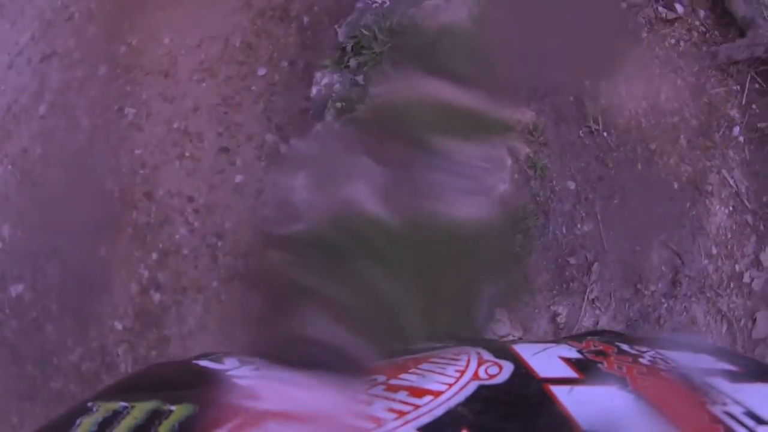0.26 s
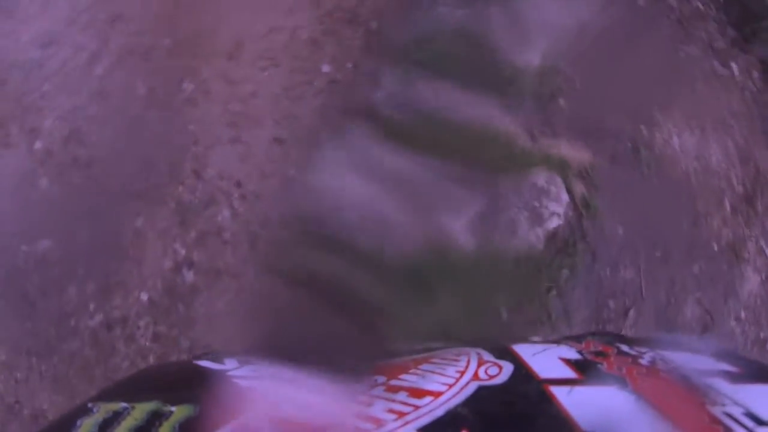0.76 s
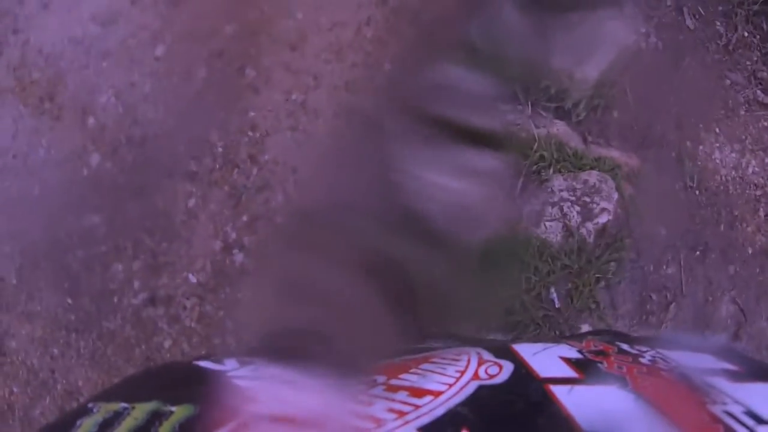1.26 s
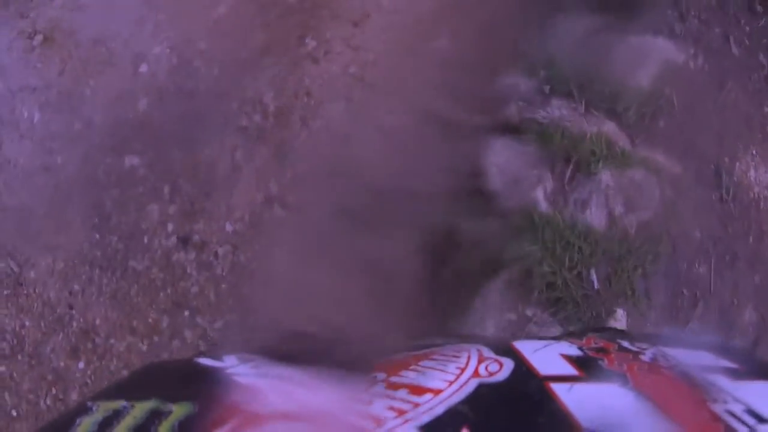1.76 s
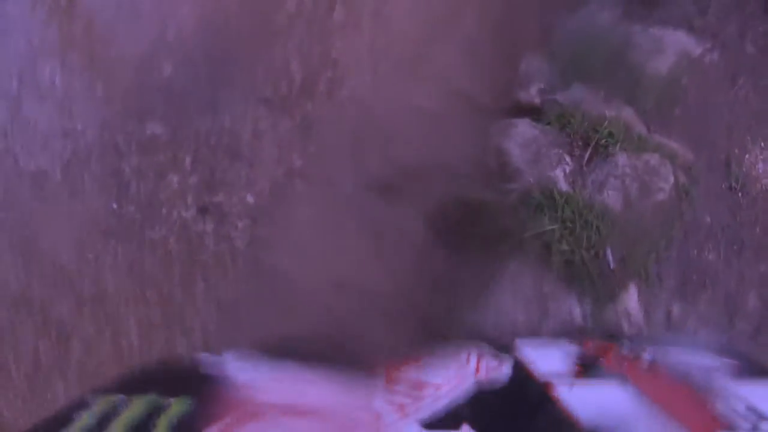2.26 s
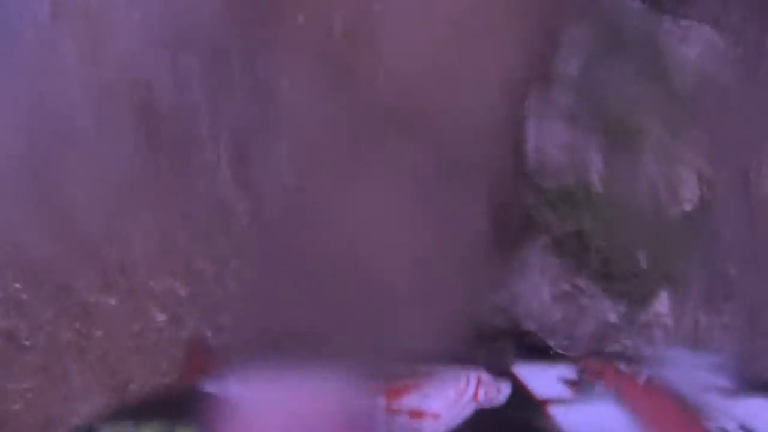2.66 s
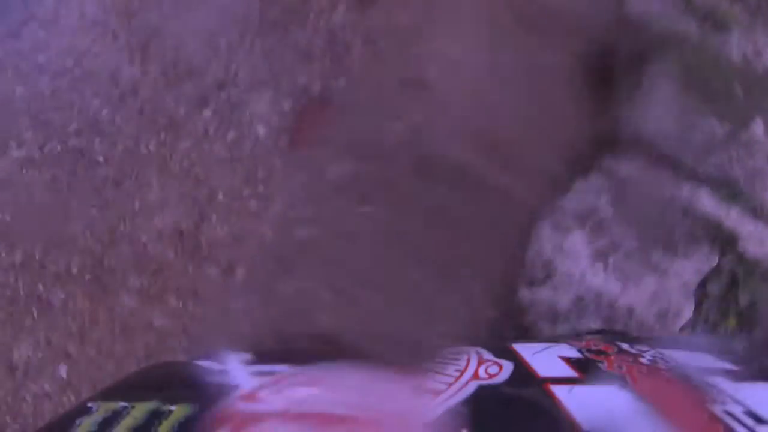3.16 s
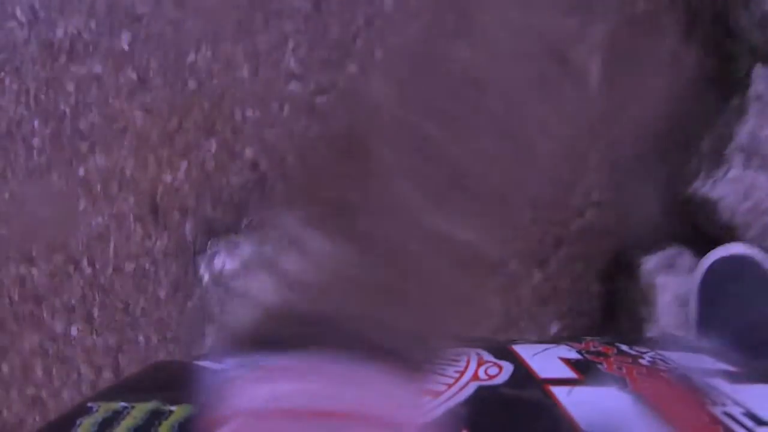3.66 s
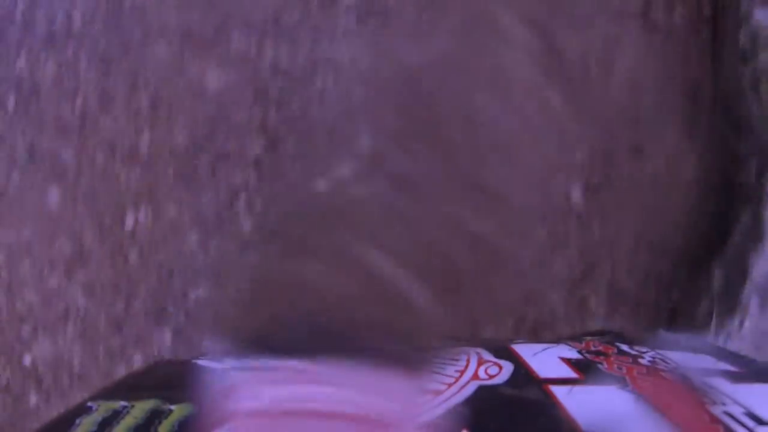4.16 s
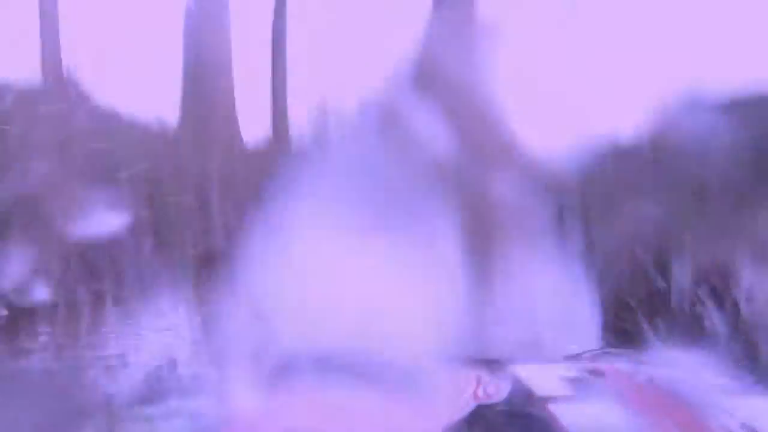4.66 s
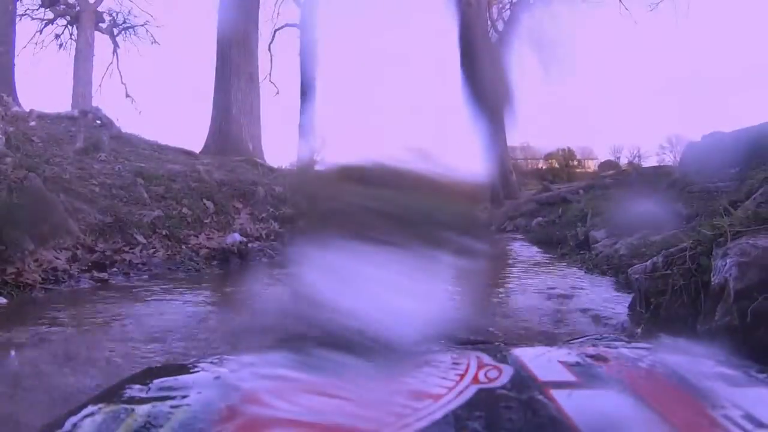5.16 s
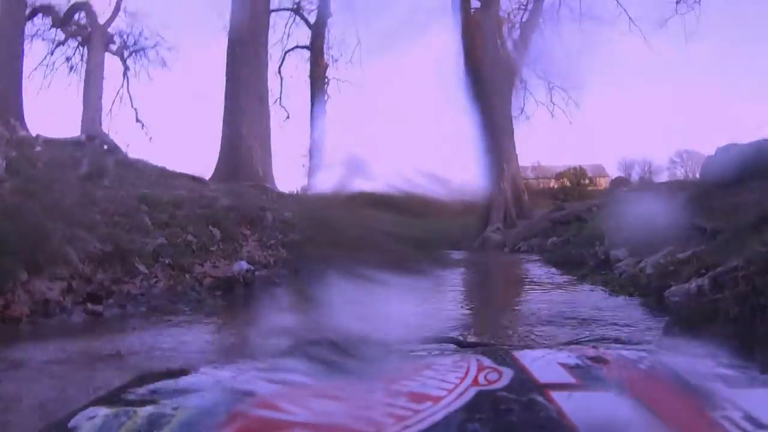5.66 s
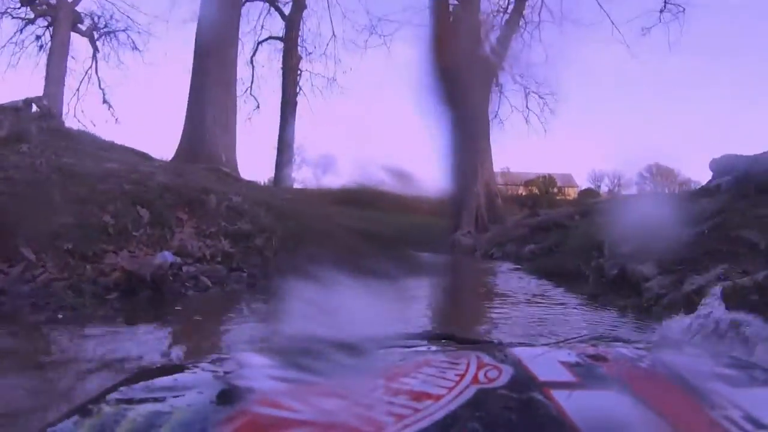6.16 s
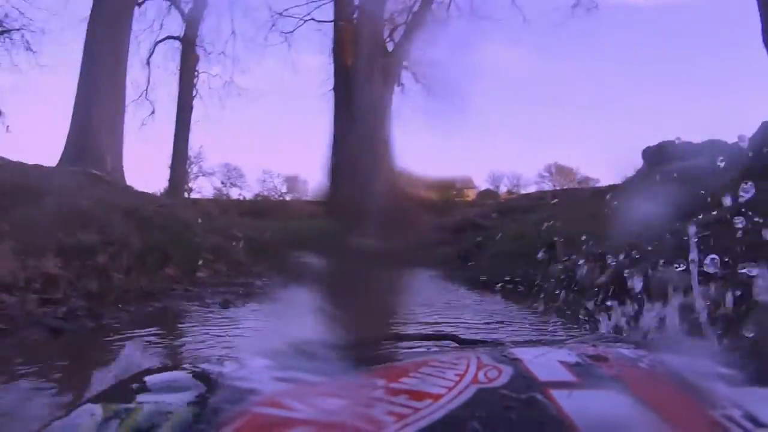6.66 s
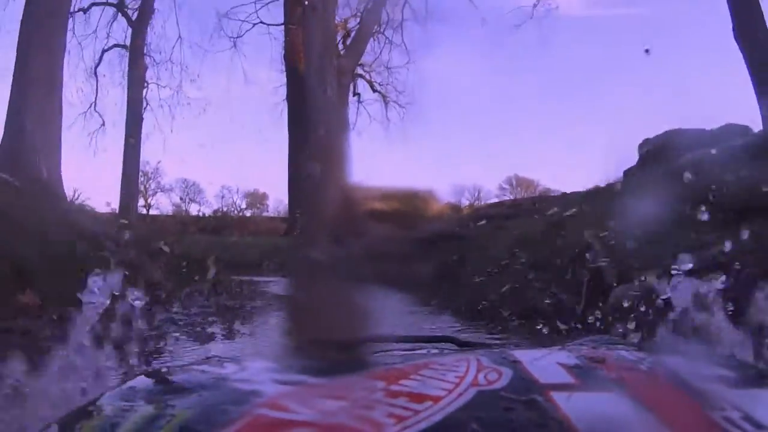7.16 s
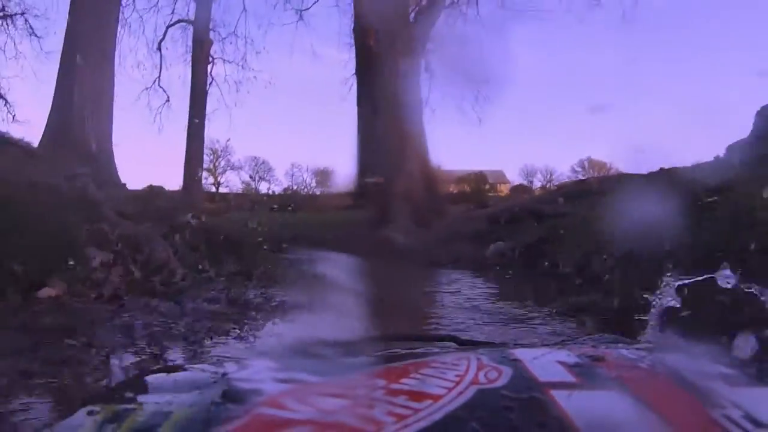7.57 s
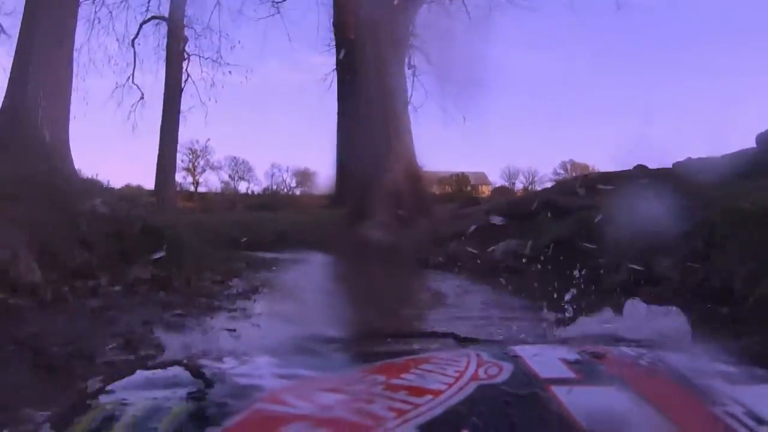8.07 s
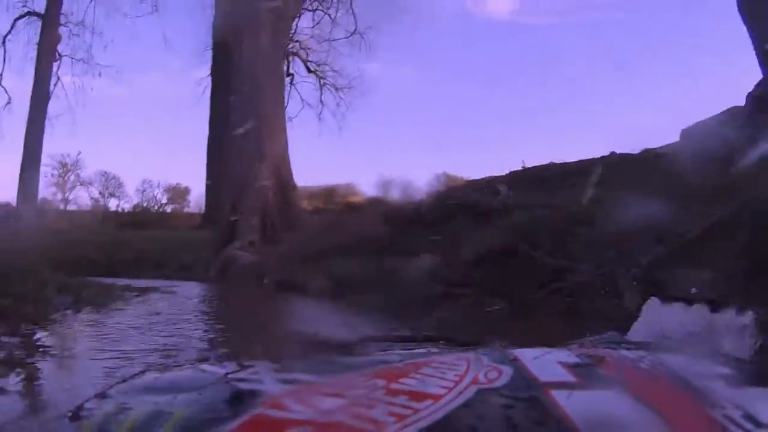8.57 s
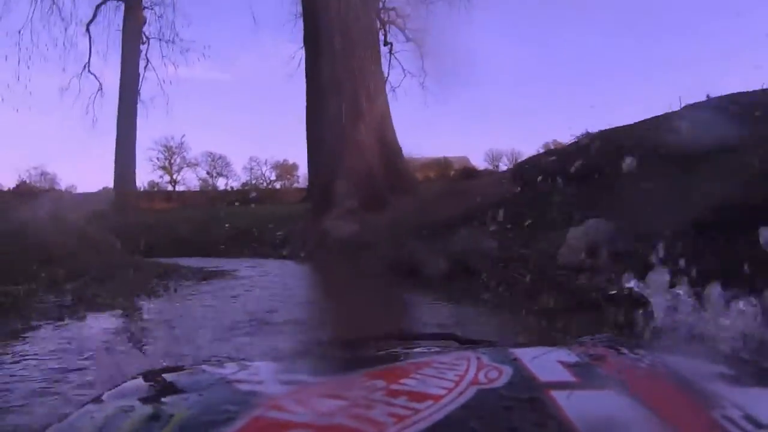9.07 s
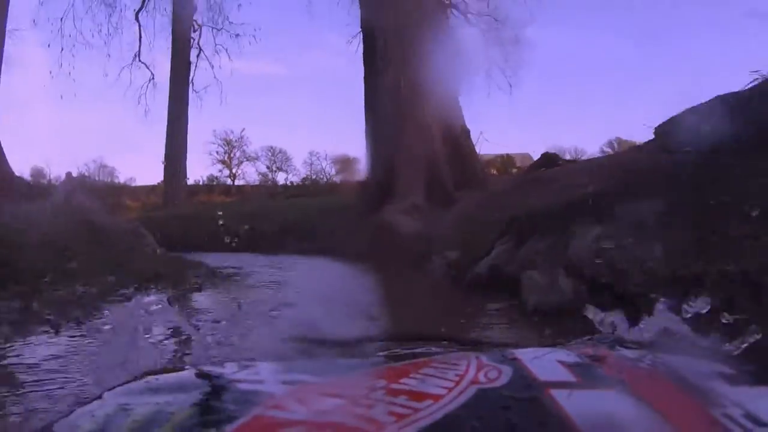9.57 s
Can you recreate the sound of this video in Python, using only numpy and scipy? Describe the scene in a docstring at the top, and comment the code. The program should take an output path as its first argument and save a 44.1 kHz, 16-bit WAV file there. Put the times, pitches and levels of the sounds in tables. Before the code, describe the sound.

Heard from inside a closed case, a toy vehicle grinds and clatters over stones, bumps hard, pauses, then drives on with gear whine and sloshing.

```python
"""A rattling, whining crawl, a lurch and a pause, then a steady hum with gear whine and sloshing, heard from inside a case.
A small electric model truck crawls, stops, then drives on through shallow creek water, carrying a closed camera case.
Shaped noise makes gear grind, bumps, sloshing and spray; sines at moving rates make wheels, motor, shaft and gears.
Decaying modes and noise make the knocks of a loose part; short noise decays make drops and grit ticking on the shell."""
import sys
import numpy as np
from scipy import signal
from scipy.fft import rfft, irfft, next_fast_len
from scipy.io import wavfile
from scipy.ndimage import map_coordinates

SR = 44100
rng = np.random.default_rng(int(sys.argv[2]) if len(sys.argv) > 2 else 0)


def gain_from_db(level_db):
    """Turn a decibel level (scalar or array-like) into a linear amplitude factor."""
    decades = np.asarray(level_db, float) / 20
    return 10 ** decades


def to_wav(sig):
    """Store sig (one row per channel, or 1-D mono) as 16-bit WAV at the path in sys.argv[1].

    Samples outside -1..1 are clipped; the rate is SR.
    """
    pcm = np.clip(np.atleast_2d(sig), -1, 1) * 32767
    pcm = np.round(pcm).astype(np.int16)
    wavfile.write(sys.argv[1], SR, pcm.T)  # frames by channels


N = 432621
TIME = np.arange(N) / SR
THROTTLE_OFF_S = 2.09

# wheels while crawling: time_s, rate_turns_per_s, shake_db (before the level of each multiple)
WHEEL_MOTION = [(0.0, 8.1, -33), (0.55, 11, -26), (0.86, 12.9, -25), (1.52, 18.3, -19.5), (1.66, 20, -12.5),
                (1.9, 21.6, -13), (2.08, 21, -12.5), (2.51, 18, -10.5), (2.74, 17, -19),
                (3.62, 11.9, -30.5), (4.31, 11.2, -25), (4.62, 10.7, -24)]
# motor while crawling: time_s, rate_turns_per_s, load_db, pinion_whine_db (levels before fixed trims)
MOTOR_MOTION = [(0, 84, -50, -31), (.12, 106, -52, -36), (.3, 93, -51, -31), (.38, 120, -54, -30),
                (.55, 135, -54, -36), (.8, 142, -49, -40), (1.25, 194, -35.5, -54), (1.4, 211, -27, -41),
                (1.57, 232, -21.5, -40), (1.75, 260, -20, -47), (1.92, 276, -18.5, -49),
                (2.07, 278, -17.5, -50), (2.16, 245, -53, -80), (3.4, 166, -66, -78), (4.45, 140, -60, -80)]
# shaking of the case: time_s, gear_grind_db, mount_db, bumps_db (levels before fixed trims)
CASE_SHAKING = [(0.0, -34.5, -26, -26), (0.41, -30, -31, -22), (0.68, -26.5, -23, -11),
                (0.82, -35, -27, -21), (1.31, -28.5, -25.5, -24), (1.42, -32.5, -30, -45),
                (1.8, -27.5, -35.5, -26), (2.12, -30.5, -28.5, -26), (2.4, -34, -24.5, -20.5),
                (2.81, -29, -22, -19), (3.41, -43, -31, -28), (3.79, -38, -37, -38), (4.4, -30, -24, -30.5),
                (4.72, -29, -18, -14.5), (4.78, -44.5, -33.5, -30), (5.16, -58.5, -52.5, -53),
                (5.41, -59, -44, -49), (5.46, -25.5, -22.5, -13.5), (5.6, -23.5, -16.5, -24),
                (9.7, -24.5, -15.5, -24), (9.81, -30, -23, -27)]
# loose part against the chassis: time_s, peak_db (before fixed trims), brightness_db
LOOSE_KNOCKS = [(0.367, -22, 3), (0.5292, -18, 0), (0.579, -13, 2), (0.6686, -15, 1), (0.709, -7.5, 4),
                (0.751, -11, -10), (0.7726, -6.5, -3), (0.796, -7.5, -1), (1.103, -16, -4),
                (1.174, -7, -12), (1.2033, -10.5, -7), (1.2435, -6.5, -10), (1.2686, -12.5, -10),
                (1.3106, -4.5, -17.5), (1.4849, -15, -2), (2.123, -4.5, -12.5), (2.2414, -4, -12.5),
                (2.2973, -3.5, -1), (2.353, -4.5, 1), (2.413, -4.5, 4.5), (2.4711, -4, -0.5),
                (2.5265, -8, -1.5), (2.588, -3.5, 0), (2.623, -16.5, 6), (2.649, -7.5, 3), (2.682, -8, 5.5),
                (2.711, -8, 6), (2.7468, -4.5, 5.5), (2.7724, -8, 1.5), (2.8086, -7.5, 6.5),
                (2.872, -10.5, 6.5), (2.9397, -14, 11), (3.0134, -11, 9.5), (3.0769, -6, 0.5),
                (3.0987, -8.5, -0.5), (3.1556, -14.5, 8.5), (3.2268, -10, -8), (3.2528, -1.5, -2),
                (3.3261, -11.5, -0.5), (4.6313, -7.5, 3), (4.6809, 0, 0), (4.7125, -9, 10.5),
                (5.335, -35, 1), (5.4297, -14, -10), (5.4483, -17, -14), (5.4861, -6, -11.5),
                (5.544, -12.5, -3), (5.5686, -13.5, -1.5), (5.6049, -16, 2)]


def unit(x):
    """Normalisation: scales a signal to an rms of 1."""
    return x / np.sqrt(np.mean(x ** 2) + 1e-20)


def along(points, hz):
    """Spectral envelope: joins (Hz, dB) points by straight lines on a log frequency axis."""
    point_hz, level_db = np.transpose(points)
    return np.interp(np.log(hz + 1), np.log(point_hz + 1), level_db)


def curves(rows):
    """Linear interpolation: one value per sample for each column after the time."""
    time_s, *columns = np.transpose(rows)
    return [np.interp(TIME, time_s, column) for column in columns]


def running(rows, fade_s):
    """Gating: 1 between the first and last row, fading linearly to 0 outside."""
    inside_s = np.minimum(TIME - rows[0][0], rows[-1][0] - TIME)
    return np.clip(inside_s / fade_s + 1, 0, 1)


def wobble(rate):
    """Slow random modulation: a smooth curve through normal random knots, rate knots a second."""
    knots = rng.standard_normal(int(N * rate / SR) + 4)
    return map_coordinates(knots, [TIME * rate])


def turns(hz):
    """Phase in radians as the running integral of a moving rate."""
    return 2 * np.pi * np.cumsum(hz) / SR


def coloured(x, db_at):
    """Minimum-phase filtering: folding the cepstrum makes the gain db_at(Hz), in dB, causal."""
    size = next_fast_len(N + SR // 4)
    gain = gain_from_db(db_at(np.fft.rfftfreq(size, 1 / SR)))
    cepstrum = irfft(np.log(gain + 1e-7), size)
    cepstrum[1:size // 2] *= 2
    cepstrum[size // 2 + 1:] = 0
    response = np.exp(rfft(cepstrum))
    return irfft(rfft(x, size) * response, size)[:N]


def case_ringing(hz):
    """Resonance: the closed case boosts bands round a few pitches, in dB."""
    # resonances of the case: centre_hz, width_hz (to 1/e of the boost), boost_db
    resonances = [(786, 33, 7), (1167, 210, 10.5), (1442, 38, 6), (1957, 520, 6), (3900, 350, 2.5),
                  (4915, 340, 7), (7110, 450, 7.5), (11050, 700, 6)]
    return sum(db * np.exp(-((hz - centre) / width) ** 2) for centre, width, db in resonances)


def case(hz):
    """Transmission: the closed case dulls the treble and rings at its resonances."""
    # sound through the case, before its resonances: frequency_hz, gain_db
    transmission = [(200, -16), (350, -10), (620, -16.5), (1000, -11), (1600, -10), (2600, -19),
                    (4000, -29.5), (5800, -47), (8200, -53), (15000, -78.5)]
    return along(transmission, hz) + case_ringing(hz)


def shell(hz):
    """Impact response: a drop on the shell sounds bright, with half the dB boost of the case resonances."""
    # a drop on the shell, before the resonances: frequency_hz, gain_db
    response = [(1500, -34), (3500, 3.5), (5000, 1), (7000, -10.5), (10000, -21), (13000, -25.5),
                (16000, -51)]
    return along(response, hz) + .5 * case_ringing(hz)


def shaking():
    """Forced vibration: rough gear contact through the case, the ringing mount and the bumps of the ground."""
    # modes of the camera mount: centre_hz, half_power_width_hz, level_db
    mount_modes = [(167, 55, -6.5), (192.3, 22, 3), (209.7, 66.7, -5.5)]
    # spectrum of the ground's bumps: frequency_hz, relative_level_db
    bump_spectrum = [(8, -23.5), (22, 6), (45, -0.5), (90, -12), (150, -14.5), (300, -33.5), (600, -58.5),
                     (1500, -120)]
    grind_db, mount_db, bumps_db = curves(CASE_SHAKING)
    grind_db = grind_db + 0.17 * wobble(8)
    bright_db = 1 + 1 * wobble(8)
    mount_db = mount_db + 2.5 * wobble(14)

    lumps_db = 0.58 * wobble(18) + 1.4 * wobble(90) + 0.95 * wobble(400)
    wheel = turns(curves(WHEEL_MOTION)[0])
    beat_db = 1.3 * running(WHEEL_MOTION, .02) * np.sin(2 * wheel)  # heavier twice a wheel turn
    contact = coloured(gain_from_db(lumps_db + beat_db) * rng.standard_normal(N), case)
    treble = coloured(contact, lambda hz: along([(2000, -39.5), (3200, 1.5)], hz))
    grind = gain_from_db(grind_db + 1.33) * (contact + (gain_from_db(bright_db) - 1) * treble) / np.std(contact)

    def mode_gain_db(hz):
        power = sum(gain_from_db(2 * db) / (1 + (2 * (hz - centre) / width) ** 4)
                    for centre, width, db in mount_modes)
        return 10 * np.log10(power)

    ringing = unit(coloured(rng.standard_normal(N), mode_gain_db))
    # the middle mode keeps ringing at a wavering pitch
    sway = np.sin(turns(mount_modes[1][0] + 13 * wobble(22)))
    mount = gain_from_db(mount_db - 1.5) * (0.67 * ringing + 0.98 * sway)

    jostle = gain_from_db(2.45 * wobble(12)) * rng.standard_normal(N)
    bumps = gain_from_db(bumps_db + 4.0) * unit(coloured(jostle, lambda hz: along(bump_spectrum, hz)))
    return grind + mount + bumps


def faint_knocks():
    """Periodic impact: faint knocks near each half wheel turn, quieter when motor load takes up the slack."""
    rattle_db, spread_db, timing_spread_s = 13, 3, .006  # rattle over the grind level
    load_damps, slack_db = 0.31, -48  # dB lost per dB of load above the slack level
    half_turns = np.diff(turns(curves(WHEEL_MOTION)[0]) // np.pi)
    at = np.flatnonzero(half_turns * (TIME[1:] < WHEEL_MOTION[-1][0]))
    luck = rng.standard_normal((len(at), 2))
    level_db = curves(CASE_SHAKING)[0][at] + rattle_db + spread_db * luck[:, 0]
    level_db -= load_damps * np.maximum(curves(MOTOR_MOTION)[1][at] - slack_db, 0)
    return [(abs(i / SR + timing_spread_s * late), db, 2) for i, db, late in zip(at, level_db, luck[:, 1])]


def knocks():
    """Modal impact: each blow rings the chassis briefly, with a dry noisy crack through the case."""
    # modes of the chassis: frequency_hz (mean of a random spread), level_db (likewise), t60_s
    chassis_modes = [(1222, -3.5, 0.027), (1385, -1.5, 0.025), (1800, -5.5, 0.018), (2226, -9, 0.0097),
                     (2750, -22, 0.018)]
    rings, cracks, t = np.zeros(N + SR), np.zeros(N + SR), TIME[:SR // 12]
    rise = 1 - np.exp(-t / .001)
    for start_s, db, bright_db in LOOSE_KNOCKS + faint_knocks():
        ring = np.zeros(len(t))
        for hz, level_db, t60 in chassis_modes:
            decay_db = level_db + rng.normal(0, 2.5) - 60 * t / t60
            ring += gain_from_db(decay_db) * np.sin(2 * np.pi * hz * (1 + rng.normal(0, 0.046)) * t)
        start = round(start_s * SR)
        rings[start:][:len(t)] += gain_from_db(db - 0.5) * rise * ring
        crack_db = db + bright_db + 10.5 - 60 * t / 0.029
        cracks[start:][:len(t)] += gain_from_db(crack_db) * rise * rng.standard_normal(len(t))
    dry_crack = coloured(cracks[:N], lambda hz: case(hz) + along([(600, -7.5), (1100, -3.5), (3500, 2.5)], hz))
    return rings[:N] + dry_crack


def jolts():
    """Damped oscillation: low decaying sines thump the whole truck."""
    # the truck runs aground and sets off again: start_s, level_db, pitch_hz, t60_s
    thumps = [(4.634, -0.5, 44.7, 0.29), (4.689, -18, 60, .08), (4.717, 0.5, 75.4, 0.06),
              (5.272, -24, 59.6, 0.13), (5.439, -10.5, 35.2, 0.26)]
    total = np.zeros(N)
    for start_s, db, hz, t60 in thumps:
        after_s = np.clip(TIME - start_s, 0, 1)
        total += gain_from_db(db - 60 * after_s / t60) * np.sin(2 * np.pi * hz * after_s)
    return total


def drive():
    """Amplitude modulation: the shaft hums, and the gear mesh whines, swelling once a shaft turn."""
    # shaft hum while driving in the water: time_s, pitch_hz, level_db (both wavering)
    shaft_motion = [(5.5, 105.8, -18), (5.7, 108, -19.5), (6.18, 111.5, -19.5), (7.31, 110, -19.5),
                    (8.32, 113.1, -21), (9.72, 113.6, -20), (9.81, 116, -33)]
    # gear mesh whine: time_s, pitch_hz, level_db (both wavering, level before a fixed trim)
    mesh_motion = [(5.58, 3430, -44), (5.8, 3275, -42), (6.1, 3156, -44), (6.45, 3180, -43.5),
                   (6.58, 3237, -40), (7.52, 3276, -43), (7.64, 3427, -40), (7.9, 3406, -36.5),
                   (8.15, 3510, -38.5), (8.5, 3400, -43), (8.85, 3393, -41.5), (8.97, 3494, -36),
                   (9.3, 3425, -42), (9.68, 3410, -41), (9.78, 3000, -56)]
    shaft_hz, shaft_db = curves(shaft_motion)
    mesh_hz, mesh_db = curves(mesh_motion)
    shaft = turns(shaft_hz * (1 + .012 * wobble(25)))
    hum = np.sqrt(2) * gain_from_db(shaft_db + 4.6 * wobble(30)) * (np.sin(shaft) + 0.36 * np.sin(2 * shaft))

    mesh = turns(mesh_hz * (1 + 0.0046 * wobble(25) + 0.0048 * wobble(150)))
    # the upper side tone is the stronger
    swell = 1 + 0.59 * np.exp(1j * shaft) + 0.083 * np.exp(-1j * shaft)
    whine_db = mesh_db + 2 + 2.86 * wobble(70) + 1.6 * wobble(9)
    whine = gain_from_db(whine_db) * np.imag(swell * np.exp(1j * mesh))
    return running(shaft_motion, 0.017) * hum + running(mesh_motion, .02) * whine


def wheels():
    """Rotating unbalance: the wheels shake the truck at their turning rate and its first multiples."""
    # harmonics of the shake: multiple_of_wheel_rate, relative_level_db
    harmonics = [(1, -1.5), (2, -6.5), (3, -18), (4, -22.5)]
    rate, shake_db = curves(WHEEL_MOTION)
    wheel = turns(rate)
    # the even multiples weaken once the throttle is off
    coast_db = -10.5 * np.clip((TIME - THROTTLE_OFF_S) / .2, 0, 1)
    shake = np.zeros(N)
    for k, db in harmonics:
        level_db = shake_db + db + (k % 2 == 0) * coast_db + 3.0 * wobble(3.91)
        shake += np.sqrt(2) * gain_from_db(level_db) * np.sin(k * wheel)
    return running(WHEEL_MOTION, 0.038) * shake


def motor():
    """Rotor harmonics: it hums once a turn; under load it buzzes and hisses, and the pinion whines in beats."""
    # buzz of the motor: multiple_of_motor_rate, level_db (before the case and a fixed trim)
    buzz_partials = [(3, -5.5), (3.3, -3.5), (3.599, -8.5), (6.001, -8.5)]
    pinion_teeth = 13
    power_hum_db, coast_hum_db = -41, -34.5  # coasting level at 150 turns per s
    lurch, steady_rate = 17.5, 110  # turns per s: the lurch is halved at twice the steady rate
    speed, load_db, pinion_db = curves(MOTOR_MOTION)
    wheel = turns(curves(WHEEL_MOTION)[0])

    powered = np.clip((THROTTLE_OFF_S - TIME) / .04, 0, 1)
    coasting_db = coast_hum_db - 0.1184 * (speed - 150)  # the hum grows as the rotor slows
    hum_db = powered * power_hum_db + (1 - powered) * coasting_db + 2.1 * wobble(4.13)
    hum = gain_from_db(hum_db) * np.sin(turns(speed))

    spin = turns(speed * (1 + 0.00706 * wobble(70)))
    buzz = np.zeros(N)
    for k, db in buzz_partials:
        level_db = load_db + db + 1.5 + 1.4 * np.sin(2 * wheel)
        buzz += gain_from_db(level_db) * (0.66 + wobble(120)) * np.sin(k * spin)
    hiss = coloured(gain_from_db(load_db + 12.0) * rng.standard_normal(N),
                    lambda hz: along([(2500, -37.5), (3800, 2)], hz))

    # in the whine the speed wavers twice a wheel turn
    swing = lurch * np.minimum(1, steady_rate / speed) * np.cos(2 * wheel)
    teeth = pinion_teeth * turns(speed + swing + .02 * speed * wobble(60))
    whine_db = pinion_db + 4 + 1.6 * np.sin(2 * wheel)
    whine = gain_from_db(whine_db) * (0.68 + speed / 300 * wobble(170)) * np.sin(teeth)
    return running(MOTOR_MOTION, .02) * (hum + coloured(buzz + hiss, case) + whine)


def speed_controller():
    """Modulation sidebands: two high tones lie twice the motor rate below and above the switching rate."""
    # switching of the speed controller: time_s, carrier_hz, lower_tone_db
    switching = [(0, 12100, -80), (.7, 12030, -76), (1, 12100, -86), (2.07, 12020, -85)]
    carrier_hz, switch_db = curves(switching)
    speed = curves(MOTOR_MOTION)[0]
    tones = np.sin(turns(carrier_hz - 2 * speed)) + .6 * np.sin(turns(carrier_hz + 2 * speed))
    return running(switching, .02) * gain_from_db(switch_db) * tones


def wading():
    """Band-limited noise: water sloshes round the axles with a wavering level."""
    # spectrum of the sloshing: frequency_hz, relative_level_db
    slosh_spectrum = [(200, -58), (280, -4), (360, 1), (450, -6.5), (700, -18), (1500, -120)]
    # strength of the sloshing: time_s, mean_level_db
    slosh_levels = [(0, -42.5), (.7, -43), (1.4, -47), (3.6, -51), (4.3, -40), (4.72, -34.5), (4.8, -61.5),
                    (5.42, -68.5), (5.5, -37), (6.3, -33), (9.81, -33)]
    slosh = unit(coloured(rng.standard_normal(N), lambda hz: along(slosh_spectrum, hz)))
    return gain_from_db(curves(slosh_levels)[0] + 2.5 * wobble(15)) * slosh


def drops():
    """Random impacts: drops and grit tick on the shell over a patter of fine drops; it clicks with listed knocks."""
    # drops and grit on the shell: start_s, peak_db (before a fixed trim)
    ticks = [(0.575, -26.5), (0.607, -31), (0.778, -30), (0.987, -39), (1.68, -35), (2.4372, -36),
             (2.6392, -24.5), (3.1714, -33.5), (4.061, -44), (4.4777, -38), (4.665, -30.5), (6.3462, -35.5),
             (6.7982, -36), (6.851, -35), (6.908, -34.5), (7.315, -37), (7.509, -34.5), (8.2, -40),
             (8.2323, -29), (8.2482, -33), (8.3077, -37), (8.383, -23.5), (8.6702, -26.5), (8.683, -35),
             (9.225, -38)]
    # fine drops: time_s, level_db (before a fixed trim)
    spray = [(0, -65), (.8, -67.5), (1.3, -71), (2.1, -67.5), (2.6, -58.5), (3.3, -66), (3.6, -93),
             (4.5, -78.5), (4.72, -61), (4.8, -76), (5.4, -91), (5.6, -68.5), (8.2, -61.5), (9.81, -61.5)]
    hits, t = np.zeros(N + SR), TIME[:SR // 20]
    # scattered mid-sized drops, over the fine ones
    stray_s = rng.random(60) * N / SR
    stray_db = np.interp(stray_s, *np.transpose(spray)) + 18 + 4 * rng.standard_normal(len(stray_s))
    clicks = [(start_s, db + bright_db - 27) for start_s, db, bright_db in LOOSE_KNOCKS]
    for start_s, db in ticks + clicks + list(zip(stray_s, stray_db)):
        decay_db = db + 7.5 - 20 * t / 0.0034
        hits[round(start_s * SR):][:len(t)] += gain_from_db(decay_db) * rng.standard_normal(len(t))

    when, size = rng.random((2, 1300))
    fine = np.bincount((when * N).astype(int), (size + 0.0037) ** -.5, N)  # many small, few large
    envelope = signal.fftconvolve(fine, gain_from_db(-20 * t[:300] / 0.002))[:N]
    patter = gain_from_db(curves(spray)[0] + 19) * envelope * rng.standard_normal(N)
    return coloured(hits[:N] + patter, shell)


def bursts():
    """Gated noise: dense crackle that stops short, heard both through the case and on the shell."""
    # scrapes on stone and sheets of water over the shell: start_s, length_s, through_case_db, on_shell_db
    # (levels before the random crackle)
    contacts = [(0.763, 0.02, 0, -29), (4.637, 0.032, -3.5, -50), (4.668, 0.0069, 1, -40),
                (4.712, 0.0256, -1, -26.5), (4.774, 0.025, -20, -45), (4.957, .03, -31, -76),
                (5.124, 0.013, -31, -75), (5.185, 0.028, -47, -76), (5.268, 0.022, -31.5, -82),
                (5.397, 0.017, -29, -76), (8.232, 0.048, -33, -35.5), (8.386, 0.015, -26, -32),
                (8.673, 0.031, -23, -30)]
    scrape, splash = np.zeros(N), np.zeros(N)
    for start_s, length_s, case_db, shell_db in contacts:
        inside_s = np.minimum(TIME - start_s, start_s + length_s - TIME)
        gate = np.clip(inside_s / 0.0057, 0, 1)
        scrape += gain_from_db(case_db) * gate
        splash += gain_from_db(shell_db) * gate
    crackle = gain_from_db(5.25 * wobble(250)) * rng.standard_normal(N)
    return coloured(splash * crackle, shell) + coloured(scrape * crackle, case)


def microphone_noise():
    """Self-noise: the microphone's own steady hiss, falling towards the treble."""
    hiss = coloured(rng.standard_normal(N), lambda hz: along([(500, 0.5), (5000, -6.5), (13000, -13)], hz))
    return gain_from_db(-82) * unit(hiss)


def scene():
    """Superposition: all sources add at one microphone."""
    truck = shaking() + knocks() + jolts() + drive() + wheels() + motor() + speed_controller()
    water = wading() + drops() + bursts()
    return (truck + water + microphone_noise())[None]


def band_limit(x):
    """A steep low-pass at the top of the band."""
    return signal.sosfilt(signal.butter(12, 15300, fs=SR, output="sos"), x)


def record(dry):
    """Saturation: the input stage rounds off the highest peaks."""
    soft = dry / (1 + np.abs(dry / .93) ** 6) ** (1 / 6)
    return band_limit(soft)


dry = scene()
out = record(dry)
to_wav(out)
```